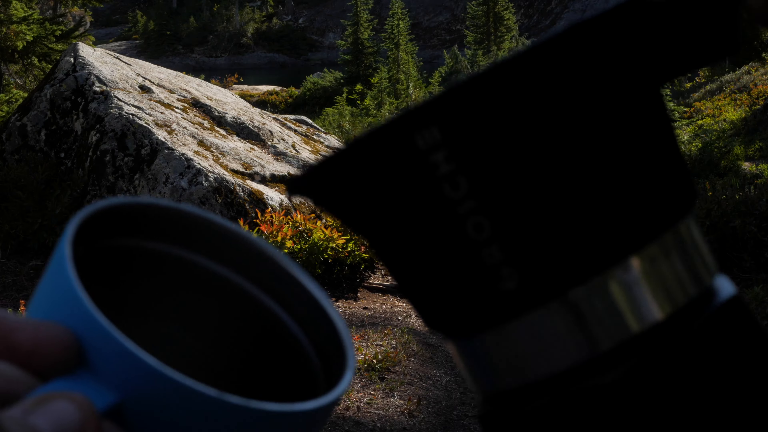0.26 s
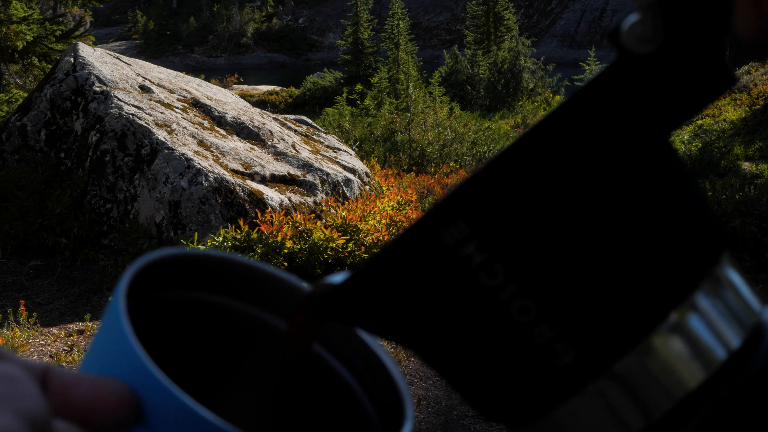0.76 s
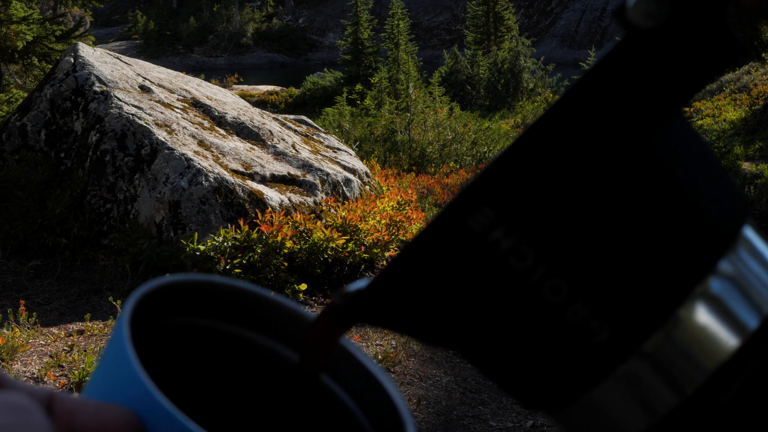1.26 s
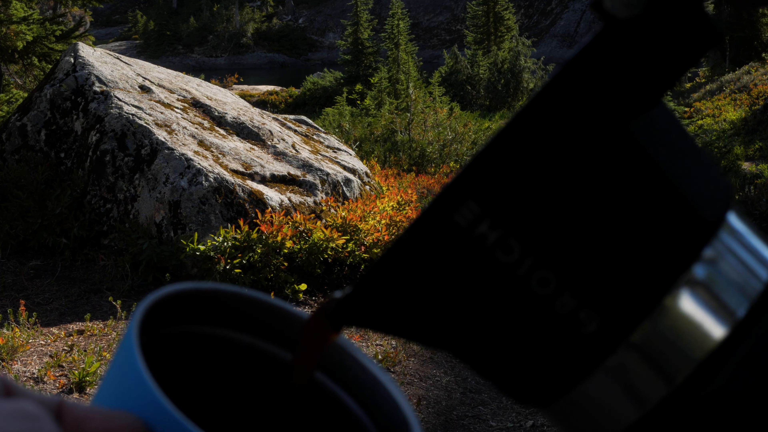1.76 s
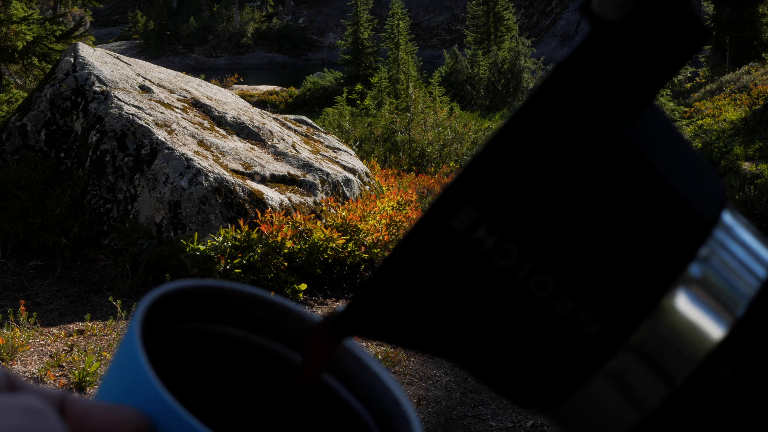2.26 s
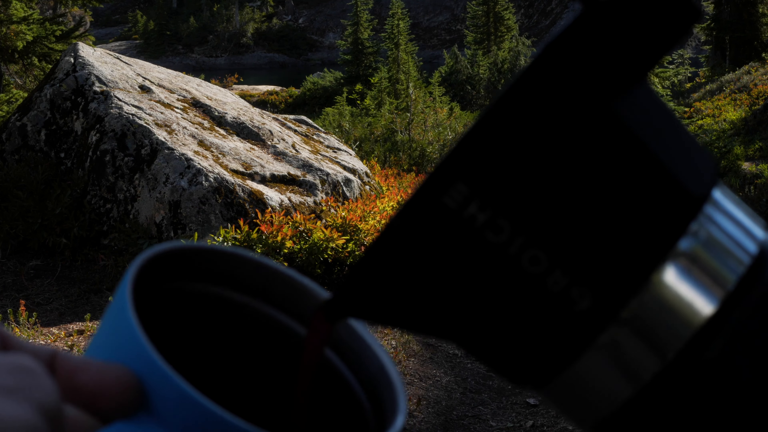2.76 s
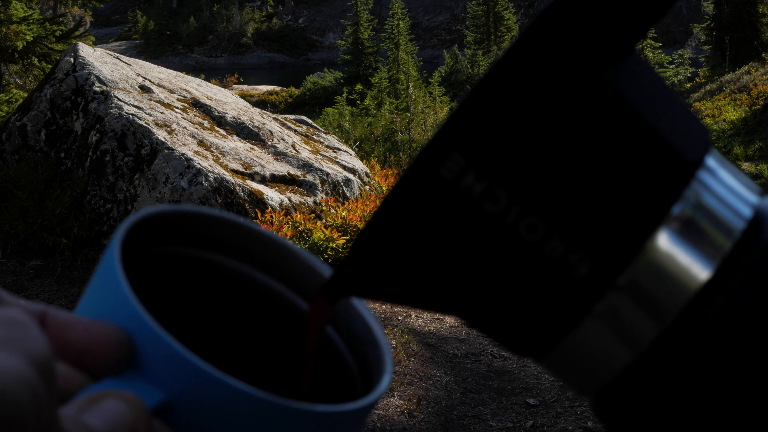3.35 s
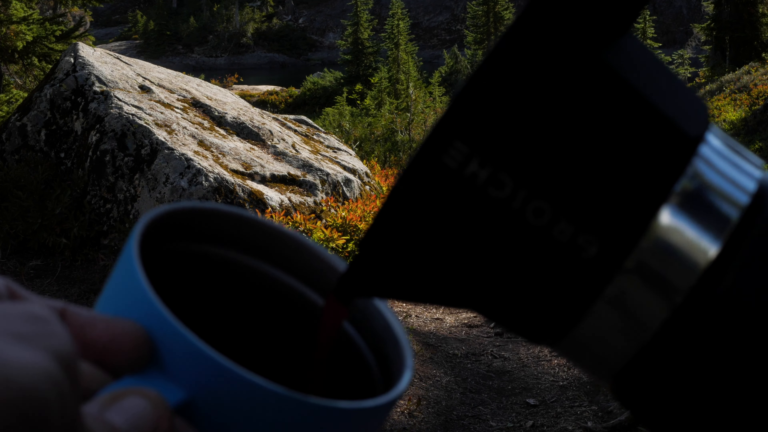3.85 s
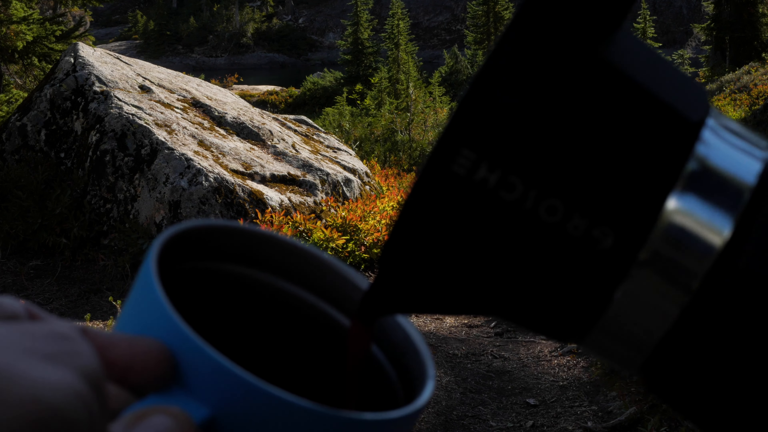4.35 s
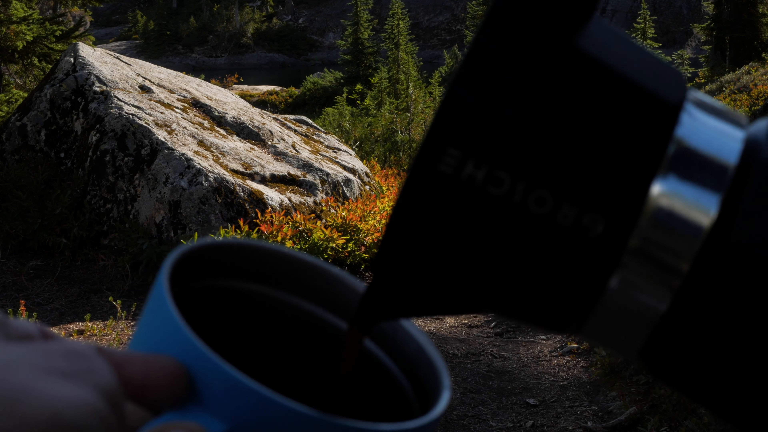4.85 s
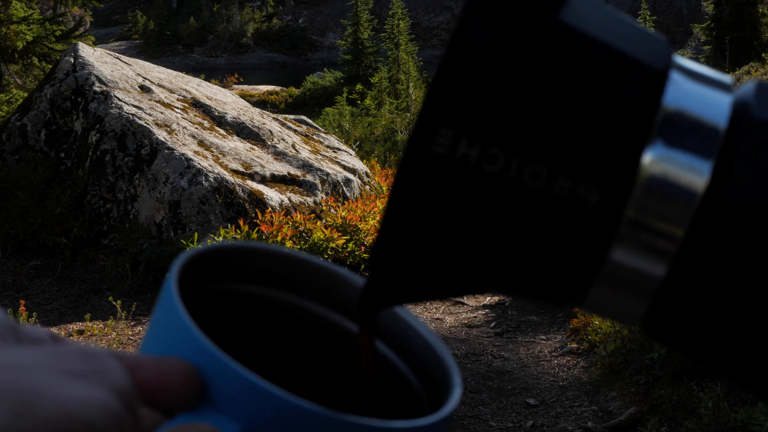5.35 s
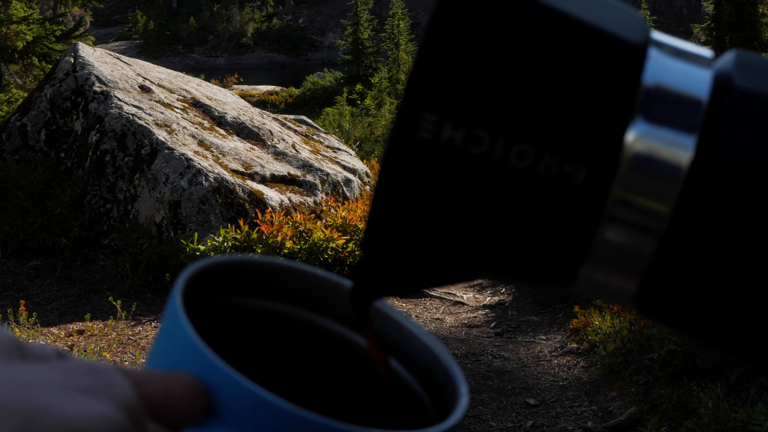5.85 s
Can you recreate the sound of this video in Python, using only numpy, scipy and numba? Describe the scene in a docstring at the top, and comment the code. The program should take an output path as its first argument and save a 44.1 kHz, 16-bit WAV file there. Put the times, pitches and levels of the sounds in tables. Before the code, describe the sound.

Hot liquid is poured from a metal camp stove cup into a mug, right next to the microphone. It gurgles, plops and ticks with small droplets, and the mug's ring sinks as it fills. After the pour, the cup's wire handle rattles, its thin wall is tapped, and its rim scrapes and clinks on the mug. Light wind rumbles on the microphone over a faint hush of open country.

```python
"""Open country, in a light wind, with the microphone close to a mug being filled from a metal stove cup.
The hot liquid gurgles, plops and ticks as its bubbles ring and droplets burst, and the mug wall rings
lower as it fills. After the pour the cup's wire handle rattles, its wall is tapped, and its rim scrapes
and clinks on the mug. Wind rumbles on the microphone over the hush of distant air and trees."""
import sys
import numpy as np
from scipy import signal
from scipy.fft import rfft, irfft
from scipy.io import wavfile
from scipy.ndimage import uniform_filter1d
from numba import njit

SR = 44100
rng = np.random.default_rng(int(sys.argv[2]) if len(sys.argv) > 2 else 0)


def digitize_waveform(pressure):
    """Quantize a signal to 16-bit integers and store it at the path in sys.argv[1].

    Rows of a 2-D input are taken as channels; values are limited to [-1, 1].
    """
    field = np.atleast_2d(pressure).T
    bounded = np.clip(field, -1, 1)
    quanta = np.round(bounded * 32767).astype(np.int16)
    wavfile.write(sys.argv[1], SR, quanta)


N = 268569
T = np.arange(N) / SR


def undb(db):
    return 10 ** (np.asarray(db) / 20)


def unit_rms(x):
    return x / np.sqrt(np.mean(x ** 2))


def band(x, lo_hz, hi_hz):
    return signal.sosfilt(signal.butter(2, [lo_hz, min(hi_hz, .45 * SR)], "band", fs=SR, output="sos"), x)


def curve(times, db):
    """Gain gliding between levels; silent outside the given times."""
    return undb(np.interp(T, times, db, left=-120, right=-120))


def swells(start, hold, db, rise_s, fall_s):
    """Gain of events that rise to their start, hold and fall away."""
    age = T - start[:, None]
    return undb(db) @ np.exp(np.minimum(age, 0) / rise_s - np.maximum(age - hold[:, None], 0) / fall_s)


def coloured(points):
    """Noise shaped by (Hz, relative dB) points; rms 1."""
    hz, db = np.transpose(points)
    bins_hz = np.arange(N // 2 + 1) * SR / N + 1e-3
    gain = undb(np.interp(np.log(bins_hz), np.log(hz), db, left=-120, right=-120))
    return unit_rms(irfft(rfft(rng.standard_normal(N)) * gain, N))


def walk(rate):
    """Random levels held 1 / rate s and smoothed twice; spread near 1."""
    step = int(SR / rate)
    held = np.repeat(rng.standard_normal(N // step + 1), step)
    return 1.3 * uniform_filter1d(uniform_filter1d(held, step), step)[:N]


def patter(rate, spread_db):
    """Noise in uneven jolts; rms 1."""
    return unit_rms(rng.standard_normal(N) * undb(spread_db * walk(rate)))


def clicks(start, db):
    y = np.zeros(N)
    np.add.at(y, (start * SR).astype(int), undb(db))
    return y


def puffs(start, db, fade_s):
    """Noise bursts that die away after each start."""
    envelope = signal.lfilter([1], [1, -np.exp(-1 / (fade_s * SR))], clicks(start, db))
    return envelope * rng.standard_normal(N)


@njit
def rings(start, hz, t60, db, glide=0., rise=1.):
    """Decaying sines that swell over rise cycles; pitch moves by the share glide."""
    y, each = np.zeros(N), np.ones(len(start))
    hz, t60, size = hz * each, t60 * each, 10 ** (db / 20)
    for k in range(len(start)):
        i, n, phase = int(start[k] * SR), int(t60[k] * SR) + 1, 0.
        for j in range(min(n, N - i)):
            phase += 2 * np.pi * min(hz[k] * (1 + glide * j / n) / SR, .45)
            swell = 1 - np.exp(-phase / (2 * np.pi * rise))
            y[i + j] += size[k] * swell * np.sin(phase) * np.exp(-np.log(1000.) * j / n)
    return y


def grains(rate, lo_hz, hi_hz, cycles, spread_db, glide=0.):
    """A random rain of small rings, some louder than the rest; rms 1."""
    when, pitch, strength, length = rng.random((int(rate * N / SR), 4)).T
    hz = lo_hz * (hi_hz / lo_hz) ** pitch
    db = np.minimum(-spread_db * np.log(1 - strength), 3 * spread_db)
    t60 = cycles * (0.34 + 1.53 * length) / hz
    return unit_rms(rings(when * (N - 1) / SR, hz, t60, db, glide, rise=0.18))


@njit
def mode(drive, hz, t60):
    """One resonance with a moving pitch; a unit click rings with peak 1."""
    y, z = np.empty(len(drive)), 0j
    for i in range(len(drive)):
        z = z * np.exp(2j * np.pi * hz[i] / SR - np.log(1000.) / (t60 * SR)) + drive[i]
        y[i] = z.imag
    return y


def body(modes, drive, waver, spot_db):
    """Modes under a running drive; the contact spot wanders, so each swells and bends on its own."""
    return sum(mode(drive * undb(db + spot_db * walk(12)), hz * (1 + waver * walk(22)), t60)
               for hz, db, t60 in modes)


# The country far behind the mug. Each row: frequency in Hz, relative level in dB.
HUSH_SPECTRUM = [(180, -29), (300, 1), (406, -7.5), (730, -9.5), (1360, -15), (1530, -20.5), (1770, -21.5),
                 (2480, -26), (2890, -25.5), (6140, -30.5), (14700, -29.5), (15700, -34), (16500, -71)]
def hush():
    """Distant air and trees; the middle band and the rest drift a little on their own."""
    air = coloured(HUSH_SPECTRUM)
    middle = band(air, 260, 1900)
    return undb(-60) * (middle * undb(0.8 * walk(4.0)) + (air - middle) * undb(0.09 * walk(5.3)))


# A faint noise that differs from left to right. Each row: frequency in Hz, relative level in dB.
SIDE_SPECTRUM = [(35, -62), (60, -53), (208, -80), (422, 16.5), (854, 13), (1470, 7.5), (6300, 12.5),
                 (14700, 11), (16500, -20)]
def side_noise():
    """A faint, steady hiss that differs between the two sides."""
    return undb(-74.5) * coloured(SIDE_SPECTRUM)


# Wind, near and far. Each row: time in seconds, then buffeting, low flutter, high flutter and roar in dB.
WIND_LEVELS = [(0, -41.5, -43, -46.5, -55), (.35, -43.5, -39.5, -42.5, -53.5),
               (.8, -43, -38.5, -43.5, -50.5), (1.2, -35.5, -38, -47.5, -51.5),
               (1.5, -34.5, -38.5, -49, -49.5), (1.85, -44, -44.5, -49, -55), (2.2, -37.5, -40.5, -46, -52),
               (2.6, -37, -40.5, -49.5, -52.5), (2.9, -42.5, -43, -44.5, -52),
               (3.35, -40, -42.5, -50.5, -50), (3.7, -38, -40.5, -47.5, -54), (4.2, -54, -40.5, -44, -52.5),
               (4.5, -50, -46, -43, -58), (4.75, -48, -37, -42.5, -56), (5.1, -48, -38, -43.5, -50),
               (5.4, -45, -47.5, -36, -51.5), (5.7, -43, -34.5, -40.5, -57.5), (5.95, -45, -39, -40, -48),
               (6.09, -45, -44, -41, -67)]
def wind():
    """Three bands of turbulence right on the microphone, and a far roar in the trees."""
    buffet = coloured([(12, 0), (20, 5.0), (36, -4), (48, -1)])
    low = coloured([(44, -22.5), (56, -5), (78, -1.5), (92, -20.5)])
    high = coloured([(78, -21.0), (92, 0.5), (118, -3), (140, -24.5)])
    roar = coloured([(130, 5.0), (165, 2.5), (270, -0.5), (340, -14)])
    times, *levels = np.transpose(WIND_LEVELS)
    return sum(curve(times, db) * part for db, part in zip(levels, (buffet, low, high, roar)))


# Handling noise. Each row: start in seconds, level in dB, pitch in Hz, ring time in seconds.
HAND_BUMPS = [(2.268, -11, 36.6, 0.14), (2.968, -17.5, 35.3, 0.22), (3.274, -22.5, 34, 0.58),
              (5.333, -16, 91.7, .1)]
def hand_bumps():
    """Low thumps of a hand, carried through the camera body to the microphone."""
    start, db, hz, t60 = np.transpose(HAND_BUMPS)
    return uniform_filter1d(rings(start, hz, t60, db, glide=-0.16, rise=0.41), 220)


# Things shifting close to the microphone. Each row: start and hold in seconds, then drive in dB for
# handle, cup wall, mug and dry rustle, then the rustle's brightness in dB, which tilt scales.
SCRAPES = [(3.112, 0.017, -61, -58, -69, -70.5, 8), (3.192, 0.033, -48, -67, -76, -69, 6),
           (3.255, 0.066, -44, -45.5, -70, -66.5, -8), (3.328, 0.13, -65, -52, -77, -66.5, -30),
           (3.764, 0.0086, -66, -70, -58, -68, -8), (3.812, 0.089, -41.5, -63, -46, -58.5, -16),
           (3.946, 0.021, -40, -77, -63, -71, 16), (4.066, .06, -39, -48, -71, -71, 6),
           (4.152, 0.011, -55, -47, -68, -67, 28), (4.203, 0.043, -48, -52, -71, -73, 18),
           (4.364, 0.066, -51, -57, -66, -73, 4), (4.486, .015, -72, -64, -62, -68.5, 20),
           (4.56, 0.048, -48, -61, -51, -65, 8), (4.848, 0.095, -50, -56, -31, -56.5, -4),
           (4.96, 0.076, -49, -62, -38, -70, -37), (5.117, 0.026, -63, -62, -30, -49.5, 7),
           (5.171, 0.1, -84, -81, -55, -66, -16), (5.54, 0.05, -51.5, -52, -46, -70, -4),
           (5.621, 0.045, -47, -70, -51, -60.5, 38), (5.694, 0.085, -48, -49, -51, -73, -17),
           (6.067, 0.014, -73, -64, -54, -89, 8)]
# The restless grip, one long faint scrape with the same columns.
GRIP = [(3.1, 3, -63.5, -53.5, -52, -74, -19.5)]
def scraping(part, tilt=0):
    """How hard one part is rubbed over time; positive tilt favours the bright scrapes."""
    start, hold, *drives, brightness = np.transpose(SCRAPES + GRIP)
    db = drives[("handle", "cup", "mug", "rustle").index(part)]
    return swells(start, hold, db + tilt * brightness, rise_s=0.0097, fall_s=0.011)


def rustle():
    """Dry friction of fingers and the cup's sleeve: grit that leaves short random rings in thin metal."""
    low = unit_rms(band(patter(60, 4.), 600, 2600))
    middle = unit_rms(band(patter(150, 4.), 3000, 9500))
    high = unit_rms(band(band(patter(250, 5.), 9500, 17000), 9000, 17000))
    middle += grains(260, 2800, 9500, cycles=220, spread_db=4.)
    high += grains(400, 9500, 15500, cycles=120, spread_db=4.)
    return (scraping("rustle", tilt=-0.24) * low + scraping("rustle") * middle
            + undb(-9.5) * scraping("rustle", tilt=0.34) * high)


# Two faint tones fade away at the very start; the other rows are close knocks of cup, mug and fingers.
# Each row: start in seconds, level in dB, pitch in Hz, ring time in seconds, crack and mug drive in dB.
TONES_AND_KNOCKS = [(.002, -45.5, 474, 0.17, -60, -89), (.004, -64, 1494, 0.54, -65, -50.5),
                    (.233, -33.5, 467, 0.031, -71, -78), (2.719, -49, 2040, 0.36, -41, -61),
                    (3.22, -45, 806, 0.032, -67, -62), (3.43, -48.5, 852, 0.14, -65, -71),
                    (4.015, -39.5, 980, 0.013, -54, -72), (4.574, -40.5, 615, 0.1, -68, -66),
                    (4.577, -34, 690, 0.038, -67, -71), (4.946, -30, 1127, 0.15, -55, -60),
                    (4.971, -29.5, 1148, 0.051, -24, -33), (4.971, -45, 632, 0.23, -58, -26),
                    (5.088, -45, 1020, 0.47, -42, -39), (5.11, -51.5, 626, 0.34, -60, -75)]
def tones_and_knocks():
    """Each is a dull, fading tone with a short crack that dies in noise."""
    start, db, hz, t60, crack_db, _ = np.transpose(TONES_AND_KNOCKS)
    tone = rings(start, hz, t60, db, rise=0.48)
    crack = rings(start, hz=2300., t60=.025, db=crack_db, rise=0.098)
    tail = band(puffs(start, crack_db - 4, fade_s=0.014), 800, 2600)
    return tone + crack + tail


def struck_metal(modes, hits, rubbing, upper_from_hz, focus_db_per_octave):
    """Each hit rings every mode, weighted by where it lands; rubbing keeps the low modes chattering."""
    start, low_db, upper_db, favoured_hz = np.transpose(hits)
    friction = band(undb(-34.5) * rubbing * patter(80, 5.), 1670, 3970)
    contact = band(clicks(start, upper_db - 10), 3000, 15000)
    out = contact + body(modes, friction, waver=0.00544, spot_db=1.8)
    for hz, db, t60 in modes:
        scatter, detune = rng.standard_normal((2, len(start)))
        if hz < upper_from_hz:
            blow_db = low_db + 1.5 * scatter
        else:
            octaves_off = np.minimum(np.abs(np.log2(hz / favoured_hz)), .6)
            blow_db = upper_db - focus_db_per_octave * octaves_off + 3.5 * scatter
        out += rings(start, hz * (1 + 0.0044 * detune), t60, db + blow_db, rise=4.3)
    return out


# The handle's modes. Each row: pitch in Hz, level in dB, ring time in seconds.
HANDLE_MODES = [(3010, -26.5, 0.68), (3360, -6.5, 0.08), (3423, -15, 0.056), (3524, 3, 0.05),
                (3820, -45, 0.027), (4120, -28, 0.027), (5176, -1.5, 0.11), (5620, -14, 0.28),
                (6300, -12, 0.06), (7560, -22.5, 0.04), (8050, -12, 0.2), (8350, -24, 0.12),
                (8880, -6.5, 0.29), (9400, -29, 0.033), (10360, -14, 0.052), (11200, -11, 0.073),
                (11380, -8, 0.067), (12200, -19, 0.055), (14100, -10, .08), (14600, -18, .08),
                (15000, -10, 0.055)]
# Its rattles. Each row: start in seconds, low and upper mode drive in dB, favoured upper pitch in Hz.
HANDLE_HITS = [(3.1477, -48, -56, 11000), (3.1921, -33, -39, 10100), (3.237, -45, -61, 6500),
               (3.2784, -44, -67, 7670), (3.3159, -47, -44, 6750), (3.3802, -41, -41.5, 5800),
               (3.4047, -37, -62, 6800), (3.462, -40, -63, 5800), (3.5214, -48.5, -61, 8870),
               (3.8092, -69, -52, 9000), (3.8457, -44, -52, 5300), (3.8666, -37.5, -48, 6000),
               (3.9374, -44.5, -48, 8150), (3.9594, -46, -54, 10100), (4.0901, -32.5, -51, 8000),
               (4.1004, -31, -37.5, 5850), (4.2314, -76, -47.5, 10700), (4.2512, -49, -51.5, 8860),
               (4.3864, -52, -47, 9500), (4.4134, -47.5, -48.5, 5430)]
def wire_handle():
    """The wire handle rattles and rubs on the cup, close to the microphone."""
    return struck_metal(HANDLE_MODES, HANDLE_HITS, scraping("handle"),
                        upper_from_hz=4500, focus_db_per_octave=17.3)


# The stove cup's modes. Each row: pitch in Hz, level in dB, ring time in seconds.
CUP_MODES = [(3910, -15, 0.06), (3760, -4.5, 0.083), (3940, -12, 0.27), (6030, -9, 0.23), (6590, -19, 0.12),
             (9200, -8, 0.51), (9400, -2.5, 0.3), (9940, -16, 0.16), (12500, 4.5, 0.16), (12900, -10, 0.14)]
# Taps on it. Each row: start in seconds, low and upper mode drive in dB, favoured upper pitch in Hz.
CUP_TAPS = [(4.4818, -53, -45.5, 6000), (4.5812, -41, -34.5, 6670), (4.8564, -38.5, -36.5, 6240),
            (5.03, -51, -51, 7750), (5.5334, -56, -67.5, 11300), (5.5664, -31.5, -57, 12000),
            (5.7134, -41, -68, 9100), (6.0616, -43.5, -40.5, 6960)]
def cup_wall():
    """The thin metal wall rings brightly when tapped or rubbed."""
    return struck_metal(CUP_MODES, CUP_TAPS, scraping("cup"), upper_from_hz=5000, focus_db_per_octave=38.)


# The mug's upper modes. Each row: pitch in Hz, level in dB, ring time in seconds.
MUG_MODES = [(1790, -12.5, 0.2), (1816, -37, 0.1), (1993, -20, 0.13), (2260, -55, 0.037),
             (2600, -43, 0.024), (2770, -11, 0.11), (2868, -14.5, 0.16), (3260, -24, 0.4),
             (4460, 2.5, 0.089), (4520, -9.5, 0.22), (5230, -1.5, 0.055), (5240, -23, 0.063),
             (6200, -27, 0.044), (7200, -18, 0.031), (9000, -28, 0.027), (10700, -27, 0.019)]
# The cup's rim on the mug. Each row: start in seconds, drive in dB, favoured pitch in Hz.
RIM_CLINKS = [(4.8435, -30, 3500), (4.884, -35, 3020), (5.1061, -25.5, 3400), (5.1143, -32, 5050),
              (5.1402, -39, 4900), (5.219, -49, 5100), (5.6112, -34.5, 3070), (5.7382, -34.5, 3380)]
def mug_wall():
    """Upper wall modes in three groups, rung by stream, plops, clinks, scrapes and knocks."""
    plop_hits = [(start, db, hz) for start, *_, db, hz in PLOPS]
    start, db, favoured_hz = np.vstack([plop_hits, RIM_CLINKS]).T
    knock_start, *_, knock_drive_db = np.transpose(TONES_AND_KNOCKS)
    knocked = clicks(knock_start, knock_drive_db)
    jolts = patter(70, 4.)
    poured, rubbed = flow("gurgle") * jolts, scraping("mug") * jolts
    # Each row: lowest, centre and highest pitch in Hz, then stream, rubbing and knock gain in dB.
    groups = [(0, 1900, 2200, -23.5, -36, 0.5), (2200, 2800, 3700, -24, -41.5, -6.0),
              (3700, 5700, 16000, -48, -52, -29)]  # soft contact barely reaches the top group
    out, focus_db_per_octave = 0, 19.5
    for lo_hz, centre_hz, hi_hz, stream_db, rub_db, knock_db in groups:
        struck = clicks(start, db - focus_db_per_octave * np.abs(np.log2(centre_hz / favoured_hz)))
        drive = undb(stream_db) * poured + undb(rub_db) * rubbed + undb(knock_db) * knocked + struck
        modes = [row for row in MUG_MODES if lo_hz <= row[0] < hi_hz]
        out += body(modes, drive, waver=.005, spot_db=2.8)
    return out


# The mug's lowest mode during the pour. Each row: time in seconds, pitch in Hz, stream drive in dB.
FILL_TONE = [(.7, 1280, -103), (.85, 1197, -78.5), (1.04, 1186, -92), (1.22, 1130, -72), (1.27, 990, -69),
             (1.5, 972, -100), (1.54, 886, -108), (1.83, 845, -72.5), (2.08, 761, -79), (2.24, 750, -85),
             (2.38, 730, -83.5), (2.76, 720, -93), (3.1, 690, -88)]
def mug_filling():
    """Stream and plops ring the lowest wall mode, which sinks as liquid loads it."""
    times, hz, stream_db = np.transpose(FILL_TONE)
    plop_start, _, _, plop_db, *_ = np.transpose(PLOPS)
    drive = curve(times, stream_db) * patter(55, 6.6) + clicks(plop_start, plop_db)
    slosh = 1 + 0.0087 * walk(29.93)
    return mode(drive, np.interp(T, times, hz) * slosh, t60=0.086)


# Tiny ticks, heard from close by. Each row: start in seconds, level in dB, pitch in Hz.
TICKS = [(.7297, -43, 14600), (.82, -40, 14900), (.8547, -39, 8750), (.9258, -42, 14900),
         (.9483, -42, 10400), (.981, -23, 6700), (1.0095, -33, 6100), (1.024, -28, 5670),
         (1.0508, -40, 11700), (1.068, -30, 5160), (1.1176, -32, 8870), (1.1273, -33, 8160),
         (1.1394, -30, 5200), (1.1644, -42, 5260), (1.1807, -32, 9700), (1.2114, -35, 8550),
         (1.2222, -35, 10300), (1.2394, -41, 8490), (1.254, -29.5, 7900), (1.4188, -40, 8000),
         (1.429, -34, 5200), (1.4966, -36, 5470), (1.7234, -35.5, 5500), (1.8019, -41, 5740),
         (1.9907, -38, 8900), (2.0303, -38, 5450), (2.164, -34.5, 12900), (2.2697, -36, 5950),
         (2.3635, -43, 5200), (2.408, -39.5, 6400), (2.4265, -38, 7100), (2.5452, -28, 14200),
         (2.7347, -29.5, 5900), (2.7963, -41, 4930), (2.8984, -43, 6070), (3.0121, -49, 13500),
         (3.1727, -45, 13000), (3.54, -47, 13500), (4.0662, -47, 5200), (4.346, -43, 9070),
         (4.8405, -38, 5900), (4.8835, -27.5, 7750), (4.9228, -33, 7850), (5.1138, -23, 5150),
         (5.1314, -23, 5290), (5.1424, -23.5, 6800), (5.219, -33, 9200), (5.3613, -41, 6500),
         (5.3693, -38, 6500), (5.6246, -32, 13700), (5.796, -38, 9800)]
def ticks():
    """Bursting droplets and small contacts: a click, a main ring, a fainter high one and a wet fizz."""
    start, db, hz = np.transpose(TICKS)
    main = rings(start, hz, t60=0.0034, db=db, glide=0.052)
    upper = rings(start, 1.18 * hz, t60=.002, db=db - 1)
    fizz = puffs(start, db - 20, fade_s=0.0072)
    return main + upper + band(clicks(start, db + 7) + fizz, 4100, 21000)


# Drops landing in the mug, close to the microphone. Each row: start in seconds, bubble level in dB,
# bubble pitch in Hz, drive to the mug's lowest and upper modes in dB, favoured upper pitch in Hz.
PLOPS = [(.4813, -43, 2980, -71, -65, 2900), (.9704, -65, 4300, -50, -45, 3980),
         (1.0246, -31.5, 5120, -60, -39.5, 4200), (1.0695, -29.5, 2100, -66, -37, 2400),
         (1.0899, -49, 2670, -72, -33, 2800), (1.1189, -31.5, 4110, -65, -34, 4200),
         (1.1543, -35, 2020, -53, -31.5, 2000), (1.1831, -52, 2750, -65, -33, 2700),
         (1.2254, -46, 1740, -35, -37, 2190), (1.2544, -42, 2720, -32.5, -29, 2280),
         (1.3309, -31.5, 2400, -56, -36.5, 2800), (1.3663, -45, 2780, -65, -58, 4400),
         (1.4012, -39.5, 2880, -53, -42, 2800), (1.4344, -55.5, 1770, -52, -33, 2090),
         (1.4855, -47, 2850, -53, -43, 2920), (1.5279, -37.5, 2020, -33.5, -50, 1900),
         (1.5524, -45, 2570, -40, -57, 2100), (1.5713, -51, 2940, -38, -63, 2300),
         (1.5848, -34.5, 2870, -32.5, -41, 3800), (1.5934, -37, 3020, -31, -60, 4500),
         (1.6217, -40.5, 4500, -45, -66, 2900), (1.6656, -39, 2060, -38.5, -46, 1900),
         (1.6816, -35, 2950, -37, -37, 2300), (1.7274, -45, 2860, -43, -52, 4000),
         (1.7534, -44, 2820, -56, -41.5, 2980), (1.7724, -49, 2880, -42.5, -60, 3000),
         (1.8018, -39, 2770, -36, -52, 3000), (1.8163, -33, 4460, -68, -46, 2300),
         (1.8294, -40, 4500, -37.5, -59, 2100), (1.8507, -32.5, 1520, -42, -36, 2080),
         (1.9046, -53, 1550, -41, -45, 3480), (1.945, -35.5, 2900, -35.5, -49, 2800),
         (2.0338, -41, 2090, -61, -39, 3260), (2.0426, -37, 2800, -62, -62, 4600),
         (2.0672, -42, 2880, -34, -42, 2800), (2.3301, -34, 2900, -42, -43, 3500),
         (2.36, -38, 3060, -55, -56, 4600), (2.3905, -47, 3820, -54, -55, 4500),
         (2.4992, -46, 4550, -59, -48, 3600), (2.5446, -47, 4660, -67, -50, 3900),
         (2.7317, -33, 4630, -46.5, -37, 4280), (2.7965, -42, 4500, -58, -34.5, 3370),
         (3.4674, -36.5, 2920, -66, -47, 2900)]
def plops():
    """Each drop hits the pool with a click and a splat; its bubble rings with a rising pitch."""
    start, db, hz, wall_db, *_ = np.transpose(PLOPS)
    bubbles = rings(start, hz, t60=0.02, db=db, glide=0.1)
    impacts = band(clicks(start, db - 0.6), 1700, 8000)
    splats = band(puffs(start, np.maximum(db, wall_db) - 9, fade_s=0.0026), 1400, 3750)
    return bubbles + impacts + splats


# At the cup's lip. One row: start in seconds, hold in seconds, level in dB.
LIP_FIZZ = [(.64, .2, -72.5)]
def lip_fizz():
    """A thin high hiss as the first liquid leaves the lip."""
    hiss = unit_rms(band(patter(32, 2.2), 10600, 11000))
    return swells(*np.transpose(LIP_FIZZ), rise_s=.03, fall_s=.02) * hiss


# The stream's steady thread. Each row: time in seconds, gurgle in dB, spray in dB.
STREAM_THREAD = [(0, -72, -101), (.17, -79, -78), (.5, -75, -79), (.97, -72.5, -65.5), (1.3, -68, -67.5),
                 (1.7, -65, -77.5), (2.2, -74, -70.5), (2.7, -76, -73), (3.08, -69.5, -69.5)]
# Its surges. Each row: start in seconds, hold in seconds, gurgle in dB, spray in dB.
STREAM_SURGES = [(.978, .005, -73, -53), (1.02, 0.017, -62.5, -60), (1.065, 0.016, -49, -69),
                 (1.105, 0.031, -58, -55.5), (1.149, 0.053, -54.5, -56.5), (1.242, 0.017, -48, -50),
                 (1.278, 0.038, -53.5, -90), (1.398, 0.056, -58, -60), (1.536, 0.058, -56.5, -72),
                 (1.786, 0.081, -55.5, -82), (1.934, 0.026, -76, -72), (2.034, 0.073, -59.5, -69.5),
                 (2.155, 0.0088, -61, -73), (2.319, 0.061, -59, -71), (2.417, 0.021, -65.5, -63),
                 (2.497, 0.0053, -70, -62), (2.545, 0.0055, -83, -69), (2.73, 0.02, -49, -80),
                 (2.83, 0.025, -77, -89)]
def flow(part):
    """Strength of the gurgle or the spray: the steady thread plus its surges."""
    column = ("gurgle", "spray").index(part)
    times, *thread_db = np.transpose(STREAM_THREAD)
    start, hold, *surge_db = np.transpose(STREAM_SURGES)
    surges = swells(start, hold, surge_db[column], rise_s=0.0036, fall_s=0.0047)
    return curve(times, thread_db[column]) + surges


def stream():
    """The pour: small bubbles and splashing gurgle under a spray of droplets and mist."""
    bubbles = grains(320, 1595, 5000, cycles=46, spread_db=3., glide=0.045)
    splash = undb(-3.6) * unit_rms(band(patter(69, 1.4), 860, 4300))
    droplets = grains(220, 4800, 15500, cycles=26, spread_db=3., glide=.05)
    mist = undb(-4.0) * grains(3000, 5000, 15500, cycles=5, spread_db=2.)
    return flow("gurgle") * (bubbles + splash) + flow("spray") * (droplets + mist)


def scene():
    """The close pour and the country behind it, nearly mono with a faint stereo width."""
    liquid = stream() + lip_fizz() + plops() + ticks()
    near = liquid + mug_filling() + mug_wall() + tones_and_knocks() + wire_handle() + cup_wall() + rustle()
    mid = near + wind() + hand_bumps() + hush()
    spread = undb(-31.5) * band(np.roll(mid, 37) - np.roll(mid, 90), 340, 16000)
    near_spread = undb(-23.0) * band(np.roll(near, 11) - np.roll(near, 26), 6600, 16000)
    side = spread + near_spread + side_noise()
    return np.array([mid + side, mid - side])


def record(dry):
    """The camera cuts the treble steeply above 15.7 kHz."""
    return signal.sosfilt(signal.ellip(8, .2, 70, 15700, fs=SR, output="sos"), dry)


dry = scene()
out = record(dry)
digitize_waveform(out)
```